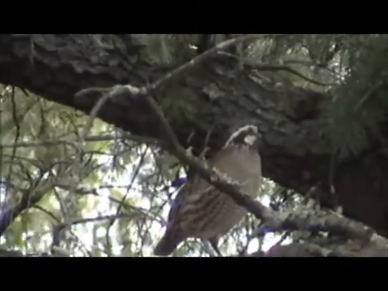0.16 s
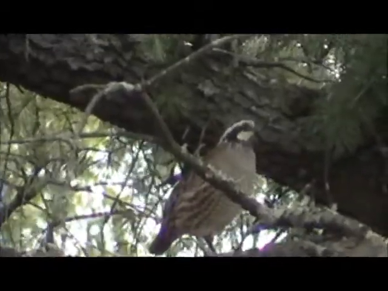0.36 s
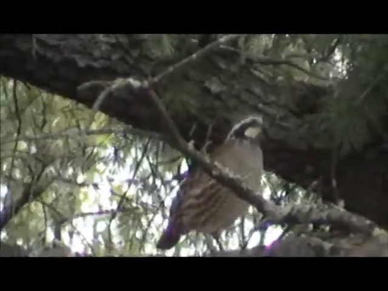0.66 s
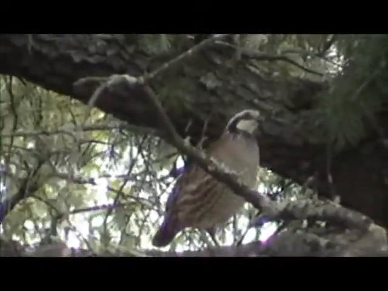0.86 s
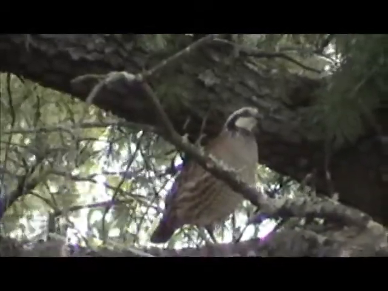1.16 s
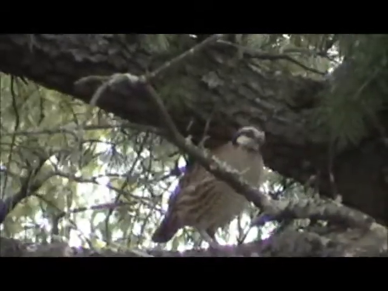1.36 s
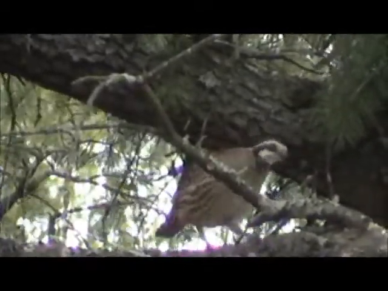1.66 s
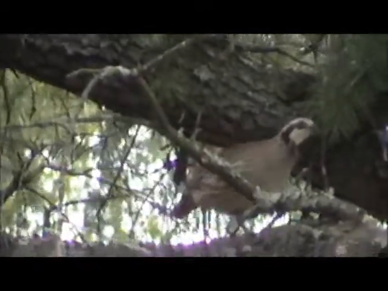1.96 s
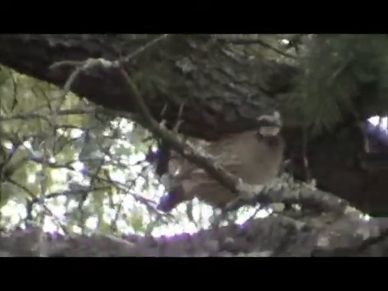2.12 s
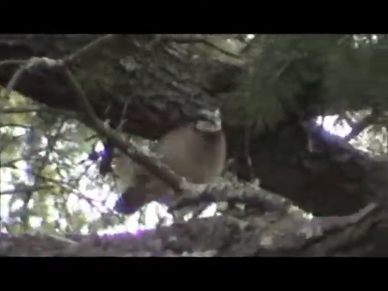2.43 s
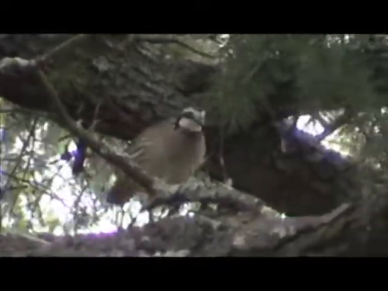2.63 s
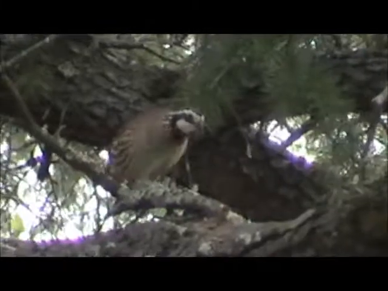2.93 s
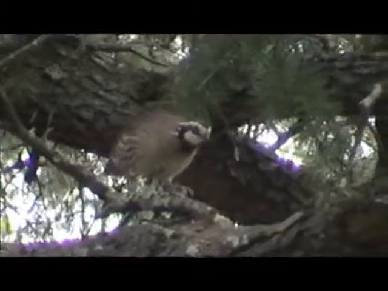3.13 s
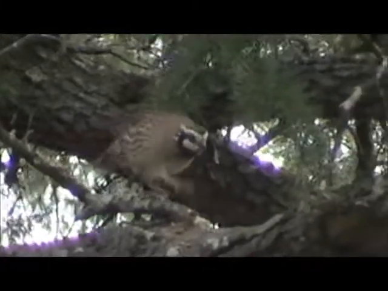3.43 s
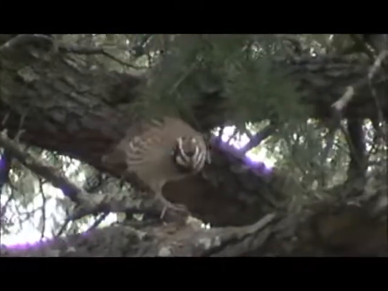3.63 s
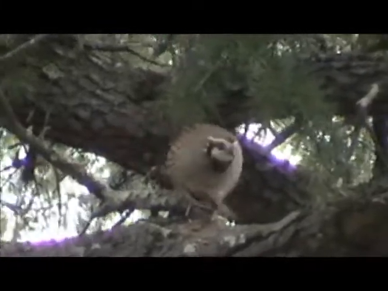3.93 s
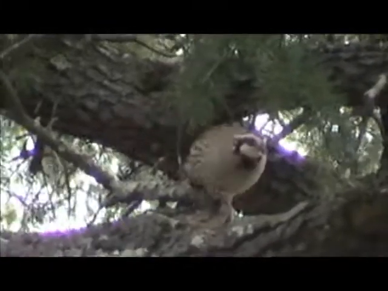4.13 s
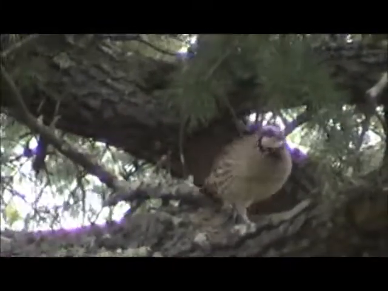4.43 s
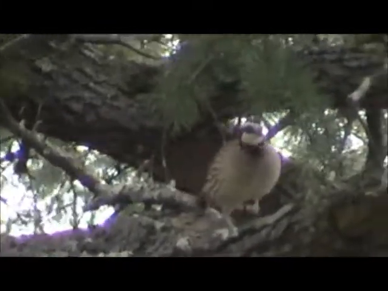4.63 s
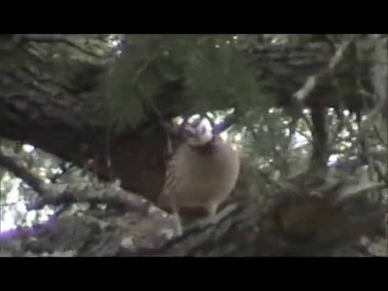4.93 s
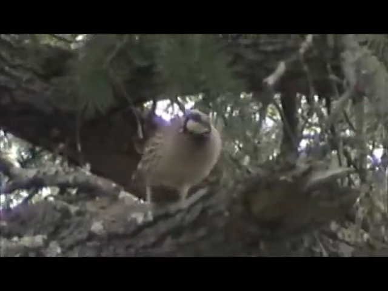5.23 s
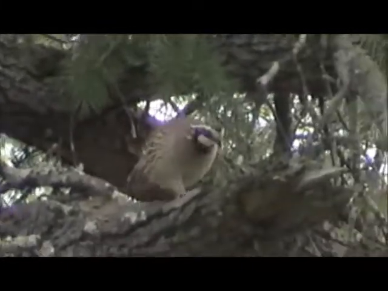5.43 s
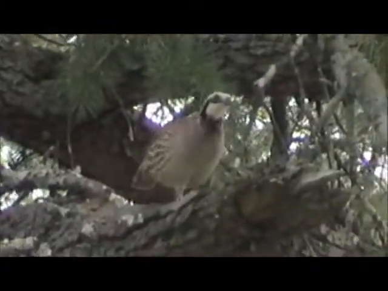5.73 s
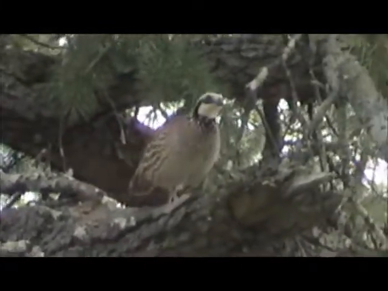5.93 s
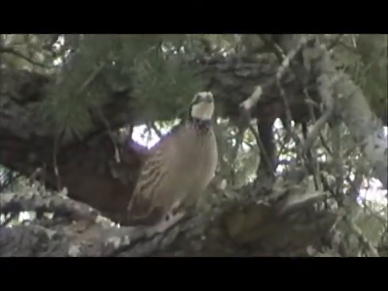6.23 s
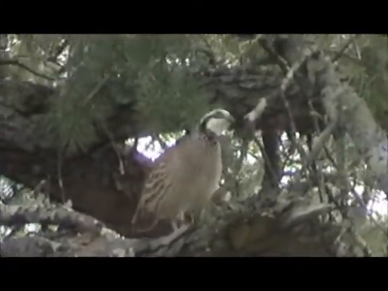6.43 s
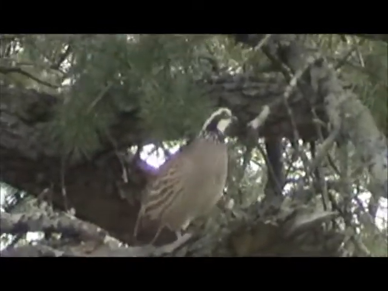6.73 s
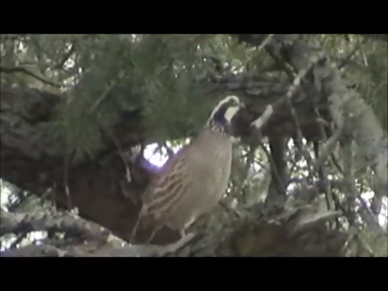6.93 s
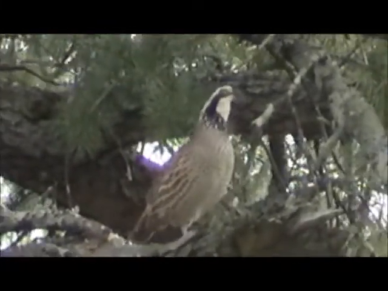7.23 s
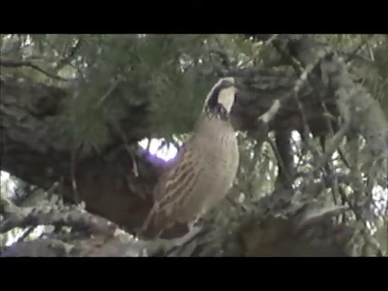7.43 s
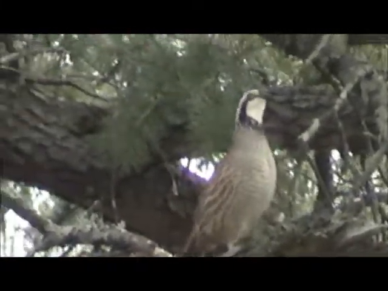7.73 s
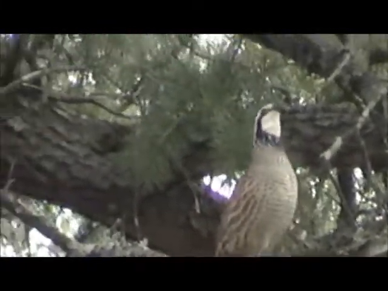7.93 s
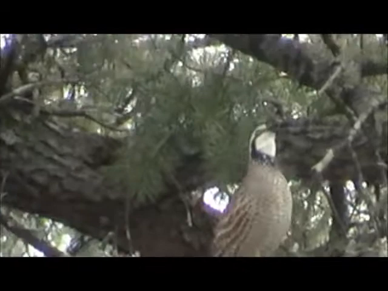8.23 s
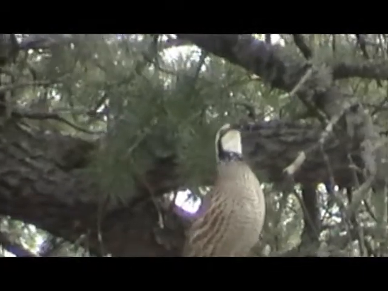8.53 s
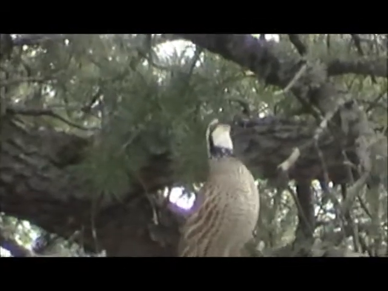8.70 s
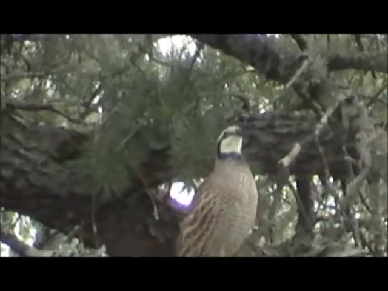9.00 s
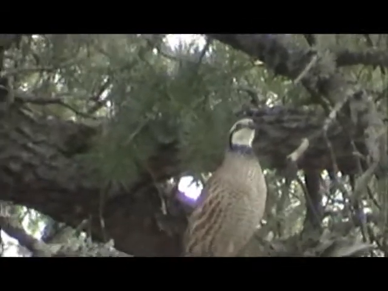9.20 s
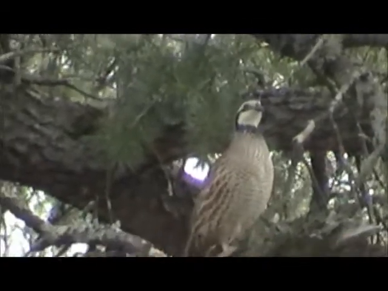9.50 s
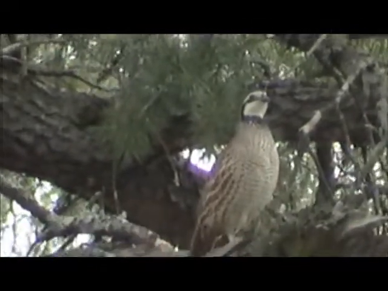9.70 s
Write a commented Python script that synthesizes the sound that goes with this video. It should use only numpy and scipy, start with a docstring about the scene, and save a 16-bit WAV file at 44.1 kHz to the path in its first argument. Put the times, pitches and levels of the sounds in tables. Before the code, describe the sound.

A close quail whistles a single two-note call late on, the first note held, the second sweeping upward and ending in a rasp, with a short woodland echo. Before that, one hears only soft scrapes of its feet on bark and scattered high calls from small birds. Far tyres and engines make a hiss and hum underneath, growing gradually louder. A soft puff of air bumps the microphone just before the call.

```python
"""A close bobwhite quail whistles "bob - white"; the second note sweeps up, then breaks into a rasp. Its syrinx
buzzes and its throat rings on one harmonic; the trees throw both notes back. The quail calls late; small birds
give thin high calls throughout, and feet scuff nearby. Far engines and tyres swell over a hiss that rises and
falls too; one puff of air bumps the microphones."""
import sys
import numpy as np
from scipy import signal
from scipy.fft import rfft, irfft, next_fast_len
from scipy.io import wavfile
from scipy.ndimage import uniform_filter1d

SR = 44100
rng = np.random.default_rng(int(sys.argv[2]) if len(sys.argv) > 2 else 0)


def file_out(sig):
    """Save sig as 16-bit WAV at sys.argv[1]."""
    # one column per channel
    cols = np.atleast_2d(sig).T
    # limit, then scale
    lim = np.clip(cols, -1, 1)
    pcm = np.round(lim * 32767).astype(np.int16)
    wavfile.write(sys.argv[1], SR, pcm)


N = 434826
T = np.arange(N) / SR

# "Bob" and "white". Each row: start and length in seconds; first pitch, held pitch and end flick in Hz;
# tone level in dB, release in seconds, overtone and buzz gains in dB, buzz width in seconds.
QUAIL_NOTES = [(8.183, .177, 1340, 1871, -84, -12.6, .016, -13, -15, .024),
               (8.853, .149, 1154, 1965, 1020, -12.5, .013, -7.5, -11, .05)]
# Harmonics. Each row: multiple of the pitch, level in dB.
WHISTLE_OVERTONES = [(2, -36.5), (3, -53), (4, -31), (5, -36), (7, -47)]
RASP_PARTIALS = [(1, -4), (2, -4.5), (3, -5.5), (4, 0), (5, 3), (6, -6), (7, -6), (8, -12), (9, -10),
                 (10, -11)]
# Spectra. Each row: frequency in Hz, relative level in dB.
THROAT_DB = [(7400, 2.5), (8200, -8), (9300, -3.5), (10300, -17), (11600, -12), (12700, -7), (13600, -20)]
BUZZ_DB = [(400, -60), (1400, -47), (2400, -28), (3300, -53), (5000, -48), (7200, -35), (9000, -43),
           (10500, -59), (12700, -54), (14500, -72)]
BEAK_DB = [(900, -28), (1500, -15), (2100, 5), (3500, 2), (4500, -11), (6000, -16), (7200, -30),
           (9000, -23.5), (12000, -28), (15000, -46)]
RUSTLE_DB = [(1500, -24), (3500, 4), (6000, 5), (7500, -2), (9000, -10), (12000, -21), (15000, -35)]
PUFF_DB = [(30, -44), (55, -21), (90, 0), (260, -3), (550, -13), (1200, -35), (3000, -70)]
WASH_DB = [(25, -22), (55, -12), (80, -2), (125, 4), (170, 2), (255, -2), (310, -7.5), (420, -8.5),
           (540, -5), (750, 1.5), (1200, -0.5), (2100, -5), (3000, -11), (3900, -16)]
HISS_DB = [(4400, -15), (5100, -13), (6000, -17.5), (7300, -16.5), (8300, -30), (10000, -35),
           (13000, -42.5), (15000, -57)]
# Reflections. Each row: delay in seconds, gain in dB.
BRANCH_ECHOES = [(.003113, -3.3), (.00499, -14.5), (.00688, -15.5), (.01613, -15), (.01872, -11.4)]
TRUNK_GROUND_ECHOES = [(.031, -34), (.098, -20.5), (.135, -28), (.21, -29)]
# Decay among the trees. Each row: frequency in Hz, T60 in seconds.
WOODS_T60_S = [(500, .7), (1900, 1), (4000, 0.66), (8000, 0.45), (14000, 0.088)]
# Small birds. Each row: start in seconds, length in seconds, base pitch in Hz, level in dB.
SEEP_CALLS = [(.89, .065, 7450, -55), (1.49, .085, 7600, -52), (2.66, .045, 7520, -45),
              (3.1, 0.14, 8150, -39), (3.69, .155, 8120, -38.5), (5.385, 0.12, 8100, -44),
              (5.86, .1, 7750, -44.5), (6.24, .13, 8010, -41), (7.37, .135, 8220, -40.5),
              (9.34, 0.15, 7940, -45.5)]  # arch, then hook down
LEVEL_CALLS = [(2.43, .17, 8750, -48), (2.78, .13, 5370, -51), (4.52, .1, 8500, -54),
               (5.2, 0.12, 8320, -42)]
FALLING_CALLS = [(1.32, 0.18, 8100, -58), (1.685, .04, 8100, -61), (1.715, 0.04, 5560, -45.5),
                 (1.84, 0.05, 6750, -62), (2.06, .07, 6100, -55)]
LOW_CHIPS = [(.03, 0.033, 3680, -47), (2.71, 0.05, 3770, -51), (3.735, 0.035, 3300, -48),
             (4.04, .06, 3500, -48), (4.26, .035, 4120, -55), (7.17, 0.046, 3680, -40.5)]
RISING_CALLS = [(.07, .07, 6830, -58), (.68, .06, 7700, -66), (.78, .04, 7900, -61),
                (2.45, .18, 3080, -47.5), (3.35, 0.082, 6150, -51.5), (8.57, 0.049, 9100, -52.5)]
# Rustles. Each row: start in seconds, length in seconds, level in dB.
FOOT_SCUFFS = [(1.5, .14, -54), (1.72, 0.13, -54), (2.62, .35, -55), (3.35, 0.14, -54), (3.97, .18, -48),
               (4.23, .18, -48), (5.35, .25, -48), (6.1, 0.99, -67), (7.72, 0.24, -51)]
# Far engines. Each row: time in seconds, level in dB.
LOW_ENGINE_DB = [(0, -60), (1, -50.5), (3.2, -46.5), (4.2, -59), (5, -63)]
HIGH_ENGINE_DB = [(4, -58), (4.6, -41), (5.1, -43), (5.6, -37), (6.3, -39), (6.9, -49.5), (7.6, -40.5),
                  (8.3, -50), (9.86, -64)]
# Swells of the wash. Each row: time in seconds, relative level in dB.
TYRE_SWELL_DB = [(0.0, -51), (0.52, -51), (1.51, -45.5), (2.66, -44), (3.07, -45), (3.9, -39.5),
                 (4.69, -41), (5.19, -38.5), (6.92, -42), (7.8, -39), (8.27, -38), (8.59, -42),
                 (9.86, -40.5)]
TREBLE_SWELL_DB = [(0, -60.5), (.5, -60), (1.55, -52), (2.25, -53), (2.7, -51), (4.1, -48), (4.75, -47),
                   (5.15, -42.5), (5.8, -45), (7.1, -43.5), (7.8, -42), (8.65, -46.5), (9.86, -47.5)]
HISS_SWELL_DB = [(0, -64), (1.1, -55.5), (2.3, -54.5), (4.1, -50), (5.4, -48.5), (6.7, -46.5), (7.4, -51),
                 (8.3, -48), (9.86, -52)]
# Swell depth by band. Each row: frequency in Hz, shares of the tyre, treble and hiss swells.
SWELL_SHARES = [(250, 0.013, 0.55, 0.31), (940, 0.95, 0, 0), (2400, 0.12, 0.9, 0.037),
                (5200, 0.28, 0.099, 0.7)]
# Stereo image of the wash. Each row: frequency in Hz, then the value noted.
COHERENCE = [(60, 0.74), (120, 1), (240, 0.89), (480, 0.9), (950, 0.96), (1890, 0.88), (3770, 0.95),
             (7520, 0.97), (15000, 0.18)]  # left-right likeness, 0 to 1
LEFT_BIAS_DB = [(60, 0), (110, 3.5), (200, 4.5), (380, 3.5), (700, -0.5), (1290, -3.5), (2380, -3.0),
                (4400, -0.5), (8120, -0.5), (15000, -0.5)]  # left minus right in dB
LEFT_LEAD_RAD = [(80, 0.049), (130, 0.034), (250, -0.16), (380, -.38), (540, -0.33), (1200, -0.22),
                 (2500, 0.04), (15000, -0.035)]  # left phase lead in radians


def quail(rasp_at_s=8.997, limb_delay_s=.02, limb_db=-14, limb_hz=3100):
    """Two notes and a rasp; near branches make the glides beat, a thick limb reflects the treble."""
    voice = np.zeros(N)
    for start_s, *note in QUAIL_NOTES:
        add(voice, start_s, whistle(*note))
    add(voice, rasp_at_s, rasp())
    out = voice.copy()
    for delay_s, db in BRANCH_ECHOES:
        add(out, delay_s, amp(db) * voice)
    treble = signal.sosfilt(signal.butter(4, limb_hz, "high", fs=SR, output="sos"), voice)
    add(out, limb_delay_s, amp(limb_db) * treble)
    return out


def whistle(length_s, first_hz, held_hz, flick_hz, db, release_s, overtone_db, buzz_db, buzz_width_s,
            settle_s=.034, scoop_hz=257, scoop_s=.0089, flick_s=.021, swell_s=.016, fade_db_per_s=22):
    """The syrinx buzzes two octaves down; the throat rings on its fourth harmonic, nearly pure."""
    t = span(length_s)
    hz = held_hz + (first_hz - held_hz) * np.exp(-t / settle_s)
    hz -= scoop_hz * np.exp(-t / scoop_s)
    hz += flick_hz * np.exp((t - length_s) / flick_s)
    phase = angle(hz * (1 + .001 * wander(len(t), 250)))
    soft_start_db = np.minimum(56 * np.exp(-t / swell_s), 20)
    tone = amp(db - soft_start_db) * np.sin(phase)
    overtones = sum(amp(level + read(THROAT_DB, k * hz)) * np.sin(k * phase)
                    for k, level in WHISTLE_OVERTONES)
    overtones *= amp(overtone_db - fade_db_per_s * t)
    overtones *= np.minimum(t / .04, 1) ** 3 * np.minimum((length_s - t) / .012, 1)  # attack, release
    buzz = sum(amp(read(BUZZ_DB, k * hz)) * np.sin(k * phase + rng.uniform(0, 2 * np.pi))
               for k in np.arange(2, 31) / 4 if k % 1)
    buzz *= amp(buzz_db) * np.exp(-((t - .6 * length_s) / buzz_width_s) ** 2)
    buzz *= 1 + .22 * wander(len(t), 60)
    return (tone + overtones + buzz) * ramps(t, scoop_s, release_s)


def rasp(length_s=.1, first_hz=1942, octave_fall_s=.075, level_db=-23.5, fade_db_per_s=113,
         snap_db=6.5, snap_s=.011, jitter=.006, flutter=.35, breath_db=-11):
    """The voice breaks into rough falling harmonics, with air noise through the open beak."""
    t = span(length_s)
    hz = first_hz / (1 + t / octave_fall_s)
    accent_db = snap_db * np.exp(-((t - snap_s) / snap_s) ** 2)
    envelope = amp(level_db - fade_db_per_s * t + accent_db) * ramps(t, attack_s=.0096, release_s=.012)
    phase = angle(hz * (1 + jitter * wander(len(t), 400)))
    stack = sum(amp(db + read(BEAK_DB, k * hz)) * np.sin(k * phase) * (1 + flutter * wander(len(t), 120))
                for k, db in RASP_PARTIALS)
    breath = amp(breath_db) * coloured(BEAK_DB)[:len(t)]
    return envelope * (stack + breath)


def small_birds():
    """Five kinds of thin call from the trees."""
    seeps = SEEP_CALLS + flock()
    return (calls(seeps, scoop=-.06, settle=.16, hook=-.16, hook_power=4.7, rough=.008, rise_db=4)
            + calls(LEVEL_CALLS, scoop=-.003, settle=.2, hook=-.0153, hook_power=2.8, rough=.0066)
            + calls(FALLING_CALLS, scoop=.2, settle=.27, hook=.0047, rough=.018, rise_db=1)
            + calls(LOW_CHIPS, scoop=.108, settle=.186, hook=.015, rough=.02)
            + calls(RISING_CALLS, scoop=-.15, settle=.44, hook=.0286, rough=.046, rise_db=-2))


def calls(rows, scoop, settle, hook, rough, hook_power=3, rise_db=0, flutter=.25, octave_db=-32):
    """Whistles that slide in and bend at the end; scoop, hook and rough are shares of the pitch."""
    out, drift, tremble = np.zeros(N), wander(N, 190), wander(N, 81)
    for start_s, length_s, pitch_hz, db in rows:
        progress = np.linspace(0, 1, int(length_s * SR))
        here = int(start_s * SR) + np.arange(len(progress))
        glide = 1 + scoop * np.exp(-progress / settle) + hook * progress ** hook_power
        phase = angle(pitch_hz * glide * (1 + rough * drift[here]))
        tone = np.sin(phase) + amp(octave_db) * np.sin(2 * phase)
        envelope = amp(db + rise_db * (progress - .5)) * signal.windows.tukey(len(progress), .2)
        add(out, start_s, envelope * tone * (1 + flutter * tremble[here]))
    return out


def flock(from_s=.8, to_s=3.2, pitch_hz=7370, spread=.07, db=-63.5, min_s=.09, max_s=.31, count=34):
    """Call rows for the faint random seeps of a farther flock."""
    return [(from_s + (to_s - from_s) * when, min_s + (max_s - min_s) * size,
             pitch_hz * (1 + spread * (detune - .5)), db)
            for when, detune, size in rng.random((count, 3))]


def rustles(grain_db=1.6, clump_db=2.2):
    """Foot scuffs on the ground: tiny snaps in clumps."""
    envelope = np.zeros(N)
    for start_s, length_s, db in FOOT_SCUFFS:
        add(envelope, start_s, amp(db) * signal.windows.tukey(int(length_s * SR), .7))
    noise = coloured(RUSTLE_DB)
    snaps = amp(grain_db * wander(N, 500) + clump_db * wander(N, 30))
    return envelope * unit(noise * snaps)


def puff(start_s=8.139, length_s=.042, level_db=-32):
    """A soft low bump of air, unrelated at the two microphones."""
    envelope = np.zeros(N)
    add(envelope, start_s, amp(level_db) * signal.windows.tukey(int(length_s * SR), .5))
    return envelope * np.array([coloured(PUFF_DB), coloured(PUFF_DB)])


def engine(rows, first_hz, sag_hz_per_s, octave_db, fading_db, waver, rough):
    """A far, uneven exhaust drone that sinks in pitch and fades in and out through the trees."""
    times_s, levels_db = np.transpose(rows)
    db = np.interp(np.arange(times_s[0], times_s[-1], 1 / SR), times_s, levels_db)
    size = len(db)
    hz = (first_hz - sag_hz_per_s * T[:size]) * (1 + waver * wander(size, 5.3))
    phase = angle(hz) + rough * wander(size, 19)
    drone = (np.sin(phase) + amp(octave_db) * np.sin(2 * phase)) * (1 + rough * wander(size, 18))
    out = np.zeros(N)
    add(out, times_s[0], amp(db + fading_db * wander(size, 4)) * drone)
    return out


def traffic_wash(level_db=-36.5, patchy_db=1.0, window=2048, hop=512):
    """Far tyres and hiss: noise that swells and brightens, nearly alike on both sides."""
    frame_s = np.arange(N // hop + 5) * hop / SR
    hz = np.fft.rfftfreq(window, 1 / SR)
    re1, im1, re2, im2, patches = rng.standard_normal((5, len(frame_s), len(hz)))
    swells_db = np.array([np.interp(frame_s, *np.transpose(curve))
                          for curve in (TYRE_SWELL_DB, TREBLE_SWELL_DB, HISS_SWELL_DB)])
    swells_db -= np.median(swells_db, axis=1, keepdims=True)
    bands_hz, *columns = np.transpose(SWELL_SHARES)
    shares = np.array([read(list(zip(bands_hz, column)), hz) for column in columns])
    patches = unit(uniform_filter1d(uniform_filter1d(patches, size=8, axis=0), size=20, axis=1))
    gain = amp(read(WASH_DB + HISS_DB, hz) + swells_db.T @ shares + patchy_db * patches)
    common, separate = re1 + 1j * im1, re2 + 1j * im2
    coherence, lean = read(COHERENCE, hz), amp(read(LEFT_BIAS_DB, hz) / 2)
    left = common * lean * np.exp(1j * read(LEFT_LEAD_RAD, hz))
    right = (coherence * common + np.sqrt(1 - coherence ** 2) * separate) / lean
    spectra = gain * np.array([left, right])
    wash = signal.istft(spectra.swapaxes(1, 2), nperseg=window, noverlap=window - hop)[1]
    return amp(level_db) * unit(wash[:, :N])


def woods(x, wet_db, spread, taps_per_s=2000, build_s=.0065):
    """Echoes off trunks and ground, and a thin tail scattered by many branches."""
    taps = rng.standard_normal((3, SR)) * (rng.random((3, SR)) < taps_per_s / SR)
    hz, t, spectra = signal.stft(taps[0] + spread * taps[1:], SR, nperseg=256)
    decay = amp(-60 * t / read(WOODS_T60_S, hz)[:, None])
    tail = signal.istft(spectra * decay * (1 - np.exp(-t / build_s)), SR, nperseg=256)[1]
    response = amp(wet_db) * tail / np.linalg.norm(tail[0])
    for delay_s, db in TRUNK_GROUND_ECHOES:
        response[:, round(delay_s * SR)] += amp(db)
    return x + signal.fftconvolve(x[None], response, axes=1)[:, :N]


def needles(x, scatter_db=-3, t60_s=.035):
    """Twigs and needles scatter short waves differently to each side."""
    t = span(.1)
    response = rng.standard_normal((2, len(t))) * amp(-60 * t / t60_s)
    response *= amp(scatter_db) / np.linalg.norm(response[0])
    response[:, 0] += 1  # direct path
    return signal.oaconvolve(x, response / np.linalg.norm(response[0]), axes=1)[:, :N]


def amp(db):
    """Decibels to gain."""
    return 10 ** (np.asarray(db) / 20)


def unit(x):
    """Scales to rms 1."""
    return x / np.sqrt(np.mean(x ** 2) + 1e-20)


def read(points, hz):
    """Interpolates on a log-frequency axis."""
    points_hz, values = np.transpose(points)
    return np.interp(np.log(hz + 1), np.log(points_hz + 1), values)


def add(mix, start_s, sound):
    """Mixes a sound in place."""
    part = mix[max(round(start_s * SR), 0):][:len(sound)]
    part += sound[:len(part)]


def wander(size, rate_hz):
    """Smooth random motion, rms about 1."""
    count = next_fast_len(max(size, SR))
    hz = np.fft.rfftfreq(count, 1 / SR)
    return unit(irfft(rfft(rng.standard_normal(count)) / (1 + (hz / rate_hz) ** 4), count))[:size]


def coloured(spectrum_db):
    """Shaped noise, rms 1."""
    gain = amp(read(spectrum_db, np.fft.rfftfreq(N, 1 / SR)))
    return unit(irfft(rfft(rng.standard_normal(N)) * gain, N))


def angle(hz):
    """Running phase of a pitch curve."""
    return 2 * np.pi * np.cumsum(hz) / SR


def span(length_s):
    """Time axis of an event."""
    return T[:int(length_s * SR)]


def ramps(t, attack_s, release_s):
    """Linear attack, hold, linear release."""
    return np.minimum(t / attack_s, 1) * np.minimum((t[-1] - t) / release_s, 1)


def pan(x, left_db):
    """Pans by level, left minus right."""
    return x * amp(np.array([[left_db], [-left_db]]) / 2)


def scene():
    """Birds in the trees over a far road."""
    bobwhite = pan(woods(quail(), wet_db=-21.5, spread=.45), left_db=-3.7)
    birds = pan(needles(woods(small_birds(), wet_db=-5.5, spread=.42)), left_db=-3.5)
    engines = engine(LOW_ENGINE_DB, first_hz=86.5, sag_hz_per_s=1.7, octave_db=-7,
                     fading_db=1.9, waver=.012, rough=.55)
    engines += engine(HIGH_ENGINE_DB, first_hz=129.7, sag_hz_per_s=1.85, octave_db=-13,
                      fading_db=1.1, waver=.006, rough=.18)
    scuffs = pan(rustles(), left_db=-1)
    return bobwhite + birds + scuffs + pan(engines + puff(), left_db=4) + traffic_wash()


def record(dry, low_cut_hz=45, high_cut_hz=15200):
    """Bass cut and band limit."""
    thinned = signal.sosfilt(signal.butter(2, low_cut_hz, "high", fs=SR, output="sos"), dry)
    lowpass = signal.firwin(511, high_cut_hz, window=("kaiser", 9), fs=SR)
    return signal.oaconvolve(thinned, lowpass[None], "same")


dry = scene()
out = record(dry)
file_out(out)
```